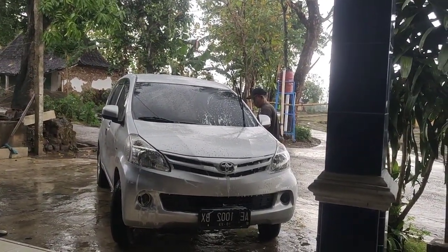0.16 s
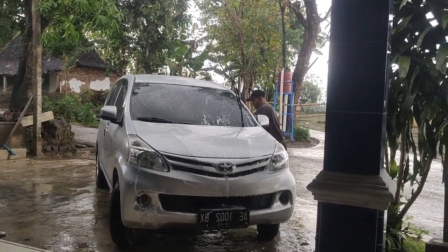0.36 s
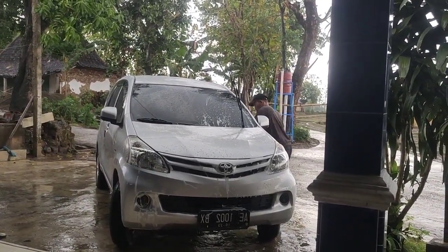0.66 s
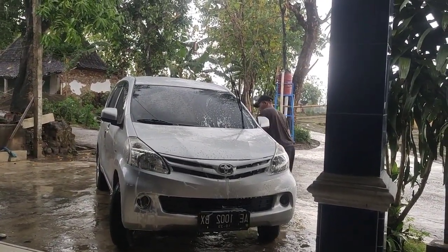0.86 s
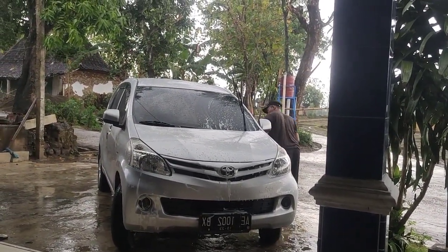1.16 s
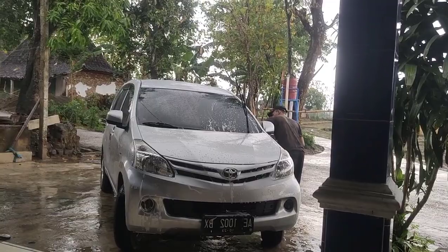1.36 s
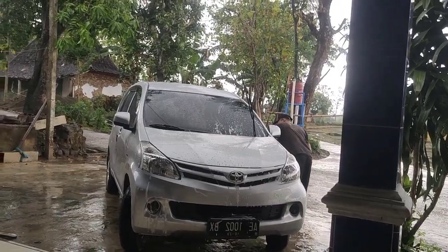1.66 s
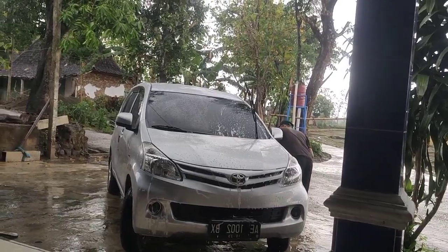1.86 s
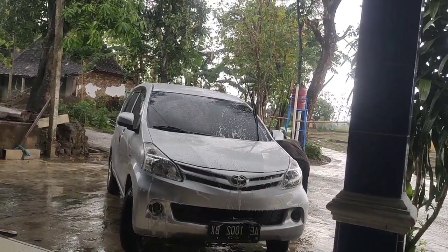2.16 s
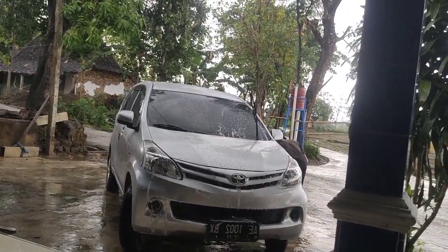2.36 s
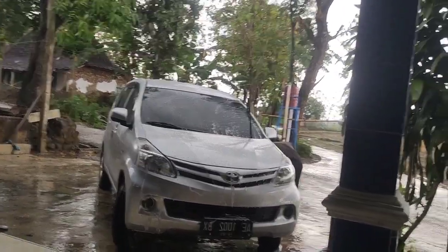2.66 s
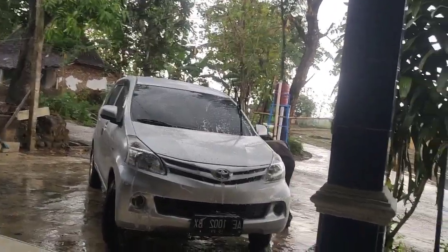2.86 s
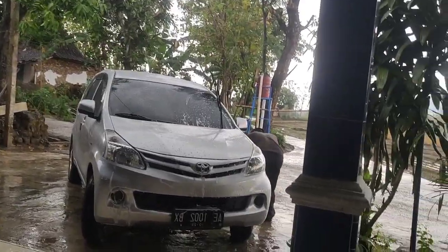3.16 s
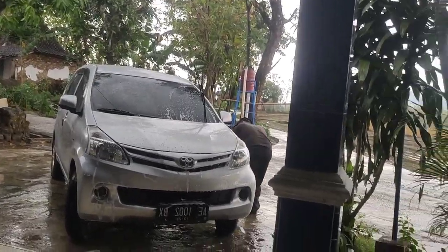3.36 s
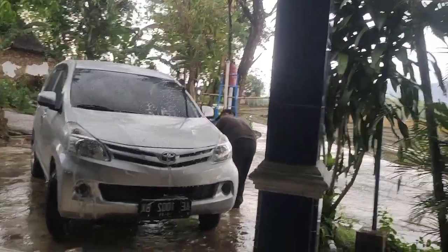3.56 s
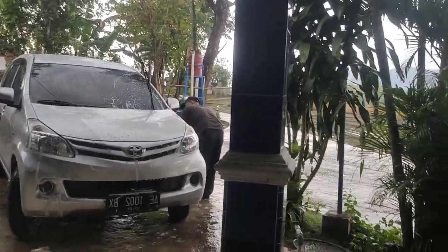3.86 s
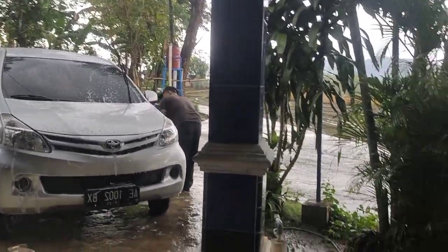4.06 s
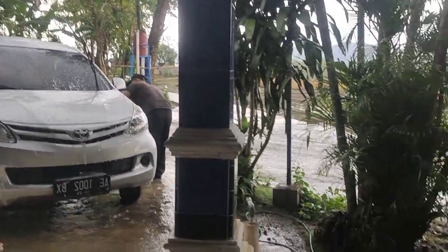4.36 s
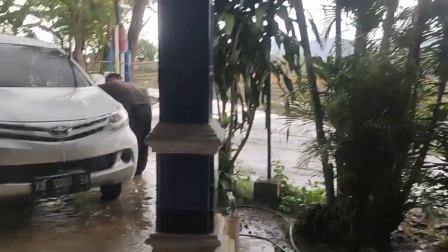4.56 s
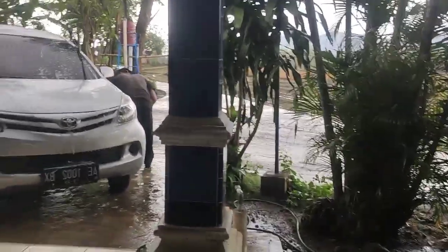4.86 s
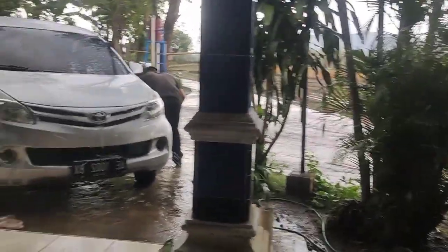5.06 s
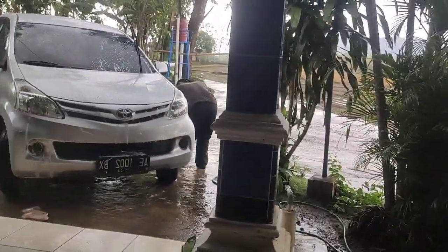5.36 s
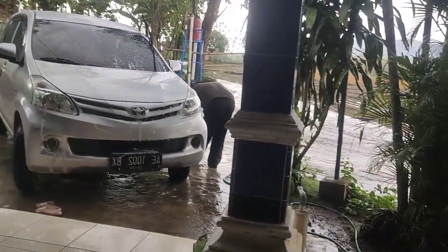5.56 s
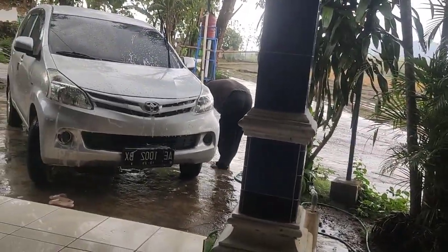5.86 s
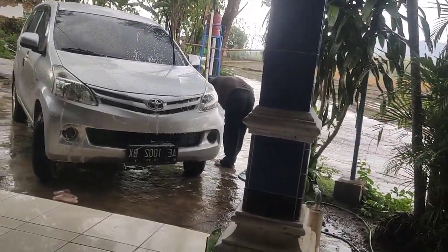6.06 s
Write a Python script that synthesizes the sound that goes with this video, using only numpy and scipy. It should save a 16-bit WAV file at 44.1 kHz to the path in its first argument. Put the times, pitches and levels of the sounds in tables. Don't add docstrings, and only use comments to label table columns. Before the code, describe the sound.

Outdoors in the rain, close drops tick first, then a rooster's rough, loud crow bursts out among overlapping hen cackles, slightly left. After its long fading note come a deep water plop and several raspy squawks. The rest is quieter: throaty clucks in loose succession and whistled chick peeps. Walls add a short tail; the wide stereo sound is dull at the very top.

```python
import sys
import numpy as np
from scipy import signal
from scipy.fft import rfft, irfft, next_fast_len
from scipy.io import wavfile
from scipy.ndimage import uniform_filter1d, minimum_filter1d

SR = 44100
rng = np.random.default_rng(int(sys.argv[2]) if len(sys.argv) > 2 else 0)


def pcm_store(signal):
    levels = np.round(np.clip(np.atleast_2d(signal), -1, 1) * 32767)
    wavfile.write(sys.argv[1], SR, levels.astype(np.int16).T)


def makeup_ratio(level_db):
    decades = np.asarray(level_db, float) / 20
    return 10 ** decades


N = 274302

# frequency in Hz, left-right likeness (-1 to 1).
SAME = [(60, -1.4), (170, 0.92), (480, 0.77), (1370, -0.08), (3870, 0.059), (11000, 0.084)]


def evened(x):
    return x / np.sqrt(np.mean(abs(x) ** 2) + 1e-20)


def read(points, hz):
    f, value = np.transpose(points)
    return np.interp(np.log(hz + 1), np.log(f + 1), value)


def add(mix, s, sound):
    part = mix[round(s * SR):][:len(sound)]
    part += sound[:len(part)]


def wander(length, hz):
    r = np.exp(-2 * np.pi * hz / SR)
    drift = signal.lfilter([1], [1, -2 * r, r * r], rng.standard_normal(length + 2000))
    return evened(drift[2000:])


def coloured(x, points):
    size = next_fast_len(len(x), True)
    gain = makeup_ratio(read(points, np.fft.rfftfreq(size, 1 / SR)))
    return irfft(rfft(x, size) * gain, size)[:len(x)]


def resonate(x, hz, width_hz):
    return signal.lfilter(*signal.iirpeak(hz, hz / width_hz, SR), x)


def unfold(rows):
    s, *columns = np.transpose(rows)
    t = np.arange(s[0], s[-1], 1 / SR)
    edge = signal.windows.tukey(len(t), min(1, .05 / (s[-1] - s[0])))
    return s[0], [np.interp(t, s, c) for c in columns], edge


def partials(hz, levels_db, jitter, flutter):
    turns = np.cumsum(hz * (1 + jitter * wander(len(hz), 59.3))) / SR
    swing = wander(len(hz) + 600 * len(levels_db), 62)
    out = np.zeros(len(hz))
    for k, db in enumerate(levels_db, start=1):
        level = makeup_ratio(db) * (1 + flutter * swing[600 * (k - 1):][:len(hz)])
        out += level * np.cos(2 * np.pi * (k * turns + rng.random()))
    return np.sqrt(2) * out, turns


def correlated(left, other):
    same = np.clip(read(SAME, np.linspace(0, SR / 2, left.shape[0])), -1, 1)[:, None]
    return np.array([left, same * left + np.sqrt(1 - same ** 2) * other])


def yard(x):
    # frequency in Hz, 60 dB decay time in seconds.
    decay = [(200, 0.32), (1000, 0.35), (4000, 0.39), (10000, 0.12)]
    taps = np.zeros((2, SR // 2))
    at = np.arange(300, SR // 2 - 20, 20) + rng.integers(0, 20, (2, (SR // 2 - 301) // 20))
    np.put_along_axis(taps, at, rng.choice([-1., 1.], at.shape), 1)
    hz, t, z = signal.stft(taps, SR, nperseg=256)
    z = correlated(z[0], z[1])
    tail = signal.istft(z * makeup_ratio(-60 * t / read(decay, hz)[:, None]), SR, nperseg=256)[1]
    return signal.oaconvolve(x[None], tail / np.linalg.norm(tail[0]), axes=1)[:, :N]


def placed(voice, rows, lag_s, pan_db, wet_db, trim_db):
    x = np.zeros(N)
    for row in rows:
        add(x, *voice(row))
    late = np.roll(x, round(lag_s * SR))
    direct = np.array([x * makeup_ratio(pan_db / 2), late * makeup_ratio(-pan_db / 2)])
    return makeup_ratio(trim_db) * (direct + makeup_ratio(wet_db) * yard(x))


def rain():
    # frequency in Hz, spectral density in dB per Hz.
    spectrum = [(24, -56), (40, -9), (253, 2), (344, 1), (608, 7), (1330, -7), (2960, -10), (4650, -24.5),
                (7640, -12.5), (8600, -16.5), (9680, -31.5), (11400, -27), (14800, -52), (22000, -120)]
    # time in seconds, level of the bright hiss in dB.
    bright_hiss = [(0, -42.5), (1.2, -44.5), (2.7, -43), (4.4, -44.5), (4.7, -49), (5.4, -47.5),
                   (6.22, -49)]
    rain_db, ticks_db = -48.5, -74
    frames, hz = N // 128 + 5, np.fft.rfftfreq(512, 1 / SR)
    a, b, c, d, patches = rng.standard_normal((frames, 257, 5)).T
    patches = evened(uniform_filter1d(uniform_filter1d(patches, size=8, axis=0), size=30, axis=1))
    flicker = evened(uniform_filter1d(rng.standard_normal(frames), size=5))
    s, hiss_db = np.transpose(bright_hiss)
    swell_db = np.interp(np.arange(frames) * 128 / SR, s, hiss_db + 59.5)
    share = np.clip(np.log(hz / 700 + 1e-9) / np.log(6), 0, 1)[:, None]

    z = correlated(a + 1j * b, c + 1j * d) * makeup_ratio(read(spectrum, hz)[:, None])
    steady = signal.istft(z, nperseg=512, noverlap=384)[1]
    scale = makeup_ratio(rain_db) / np.sqrt(np.mean(steady ** 2))
    z *= makeup_ratio(0.34 * patches + share * (swell_db + 1.7 * flicker))
    wash = scale * signal.istft(z, nperseg=512, noverlap=384)[1][:, :N]

    hits = rng.random((2, N)) < 400 / SR
    size = makeup_ratio(6.3 * np.minimum(rng.exponential(1, (2, N)), 5)) * hits
    t = np.arange(120) / SR
    click = np.exp(-t / 0.00019) * np.sin(2 * np.pi * 7000 * t)
    ticks = signal.oaconvolve(size, click[None], axes=1)[:, :N]
    swell = makeup_ratio(np.interp(np.arange(N) / 128, np.arange(frames), swell_db))
    return wash + makeup_ratio(ticks_db) * evened(ticks) * swell


def drip(s, db, hz):
    t = np.arange(3000) / SR
    tick = np.exp(-t / 0.0035) * np.sin(2 * np.pi * hz * t)
    splash = evened(resonate(rng.standard_normal(len(t)), hz, 0.21 * hz)) * np.exp(-t / 0.0042)
    return s, makeup_ratio(db) * (tick + 1.54 * splash)


def near_drips():
    # start in seconds, peak level in dB, ring frequency in Hz.
    drops = [
        (0.0473, -39.5, 8100),
        (0.0657, -37.5, 2790),
        (0.1376, -38, 3140),
        (0.1642, -43, 4220),
        (2.514, -27.5, 1400),
        (6.205, -36.5, 7000),
    ]
    return placed(lambda row: drip(*row), drops, .00002, .3, 0.93, 1.0)


def peep(s, db, stretch):
    # time in seconds, pitch in Hz, level in dB.
    glide = [
        (0, 4180, -18),
        (.03, 4400, -16),
        (.085, 4230, -18),
        (.11, 4020, -15),
        (.13, 3450, -12),
        (.165, 2800, -10),
    ]
    _, (hz, shape_db), edge = unfold([(at * stretch, pitch, level) for at, pitch, level in glide])
    return s, partials(hz, [db + shape_db], jitter=.006, flutter=.45)[0] * edge


def chick():
    # start in seconds, peak level in dB, time stretch as a ratio.
    peeps = [(0.16, -36, 0.94), (.545, -37, 1.22), (4.245, -36, 1.09), (4.843, -36, 1.01),
             (5.178, -34, .98), (5.766, -36, 0.94)]
    return placed(lambda row: peep(*row), peeps, .00005, 0.4, 0, 1.2)


def cackle(rows, above_db):
    # frequency in Hz, throat gain in dB.
    throat = [(260, -15), (520, -14), (1050, 2.5), (1600, -6), (1900, -2.5), (2200, 6), (2800, 3.5),
              (4000, -14.5), (5500, -17.5), (7600, -2.5), (9000, -25), (11500, -23.5)]
    strain_hz, bright_db_per_hz = 521, 0.1067
    s, (hz, effort_db, rough), edge = unfold(rows)
    push_db = 0.14 * (effort_db - effort_db.max())
    bright_db = above_db + effort_db + push_db + bright_db_per_hz * (hz - strain_hz)
    tiring = np.linspace(0, 1, len(hz)) ** 3
    rough, half_db = np.clip(rough, 0, 1), -24 + 26 * tiring
    levels = []
    for k in range(1, 19):
        source_db = bright_db if k > 7 else effort_db
        levels.append(read(throat, k * hz / 2) + source_db + half_db * (k % 2))
    tone, turns = partials(hz / 2, levels, jitter=.03 * rough, flutter=.15 + 1.1 * rough)

    gate = 0.59 + np.exp(-(2 * turns % 1) / 0.098)
    puffs = coloured(gate * rng.standard_normal(len(hz)), [(400, -36), *throat[1:]])
    low = signal.lfilter(*signal.butter(2, 1900, fs=SR), puffs)
    breath = (.6 + tiring) * makeup_ratio(effort_db) * low + 1.1 * makeup_ratio(bright_db) * (puffs - low)
    breath = breath / np.std(low)
    hiss = evened(coloured(puffs, [(3500, -18), (5000, -4.5)]))
    return s, edge * (np.sqrt(1 - rough ** 2) * tone + rough * breath + makeup_ratio(bright_db + 1.5) * hiss)


def syllable(s, length, db, hz, after_hz):
    rough_start, rough_break, rough_end = .46, .33, .55
    return [(s, hz, db + 33.5, rough_start),
            (s + 0.0067, hz, db, rough_start),
            (s + 0.38 * length, hz, db - 1.0, rough_start),
            (s + .5 * length, after_hz, db + 3, rough_break),
            (s + 0.72 * length, after_hz, db - 6.0, rough_break),
            (s + length, .98 * after_hz, db - 12.5, rough_end)]


def other_hen():
    # start in seconds, length in seconds, effort in dB, pitch in Hz, pitch after the break in Hz.
    calls = [
        (.465, 0.1, -25.5, 501.4, 497),
        (0.564, 0.14, -27.5, 549, 561),
        (0.774, 0.029, -23.5, 525, 528),
        (0.894, 0.353, -25, 528.7, 547),
        (1.505, 0.27, -28.5, 513.7, 518.3),
        (2.501, 0.1, -36, 530, 523.5),
    ]
    return placed(lambda rows: cackle(rows, above_db=-15), [syllable(*row) for row in calls],
                  0.00015, -0.45, -1.3, -7.5)


def crow(rows, hoarse):
    # frequency in Hz, throat gain in dB.
    throat = [(2200, -9.5), (3000, 3), (4000, -23), (5500, -2.5), (7500, 9), (9000, -24), (11500, -16.5)]
    # frequency in Hz, gain in dB.
    beak = [(1150, -9), (1400, -1.5), (1700, 3), (2050, -23.5), (2550, -28)]
    s, (hz, first_db, beak_db), edge = unfold(rows)
    second_db, third_db = (first_db + beak_db + read(beak, k * hz) for k in range(2, 4))
    upper_db = first_db + .5 * beak_db - 31
    upper = [upper_db + 3 + read(throat, k * hz) for k in range(4, 14)]
    levels = [first_db, second_db, third_db] + upper
    tone, turns = partials(hz, levels, jitter=.006 * hoarse, flutter=.25 * hoarse)

    puffs = (1.1 + np.exp(-(turns % 1) / 0.59)) * rng.standard_normal(len(hz))
    rasp = evened(coloured(puffs, [(350, -47), (650, -7.5), (1700, 15), (2050, 15.5), (2500, -14)]))
    breath = evened(coloured(puffs, [(1500, -10), *throat]))
    rasp_level = makeup_ratio(np.maximum(first_db, second_db) - 16) * hoarse
    return s, edge * (tone + rasp_level * rasp + makeup_ratio(upper_db + 7) * breath)


def note(s, length, db, hz, beak_db):
    rise_s, scoop, sag_hz_per_s = 0.024, 0.0299, 230
    hold = .78 * length
    return [(s, hz * (1 - scoop), db + 4, beak_db),
            (s + rise_s, hz, db, beak_db),
            (s + hold, hz - sag_hz_per_s * hold, db, beak_db),
            (s + length, hz - sag_hz_per_s * length, db - 10, beak_db)]


def rooster():
    # start in seconds, length in seconds, effort in dB, pitch in Hz, beak opening in dB.
    short_notes = [
        (0.48, .21, -28, 710, 5.5),
        (0.561, 0.1, -31.5, 590.3, 5.5),
        (0.767, 0.074, -26, 757, 2.5),
        (0.803, 0.1053, -17.5, 854.3, 0),
        (.975, 0.226, -34.5, 771, 11.5),
        (1.232, 0.208, -17.5, 855, 0.5),
        (1.972, 0.12, -31, 700, 7),
    ]
    # time in seconds, pitch in Hz, effort in dB, beak opening in dB.
    long_note = [
        (1.07, 608.6, -35, 2),
        (1.15, 687, -24, 6),
        (1.24, 699, -12, -18),
        (1.31, 711.6, -33, 3),
        (1.42, 687.5, -17.5, -5),
        (1.5, 712, -22.5, -3),
        (1.6, 678.5, -35, 14),
        (1.68, 653, -29, -11),
    ]
    # time in seconds, pitch in Hz, effort in dB, beak opening in dB.
    last_note = [
        (1.786, 550, -26.5, -2.5),
        (1.871, 580.3, -21, -6.5),
        (1.958, 592, -24.5, 1),
        (2.028, 585.7, -41, -7.5),
        (2.13, 597.5, -22, -1),
        (2.2, 576.5, -24.5, -5.5),
        (2.269, 535, -31, 1),
        (2.45, 501.5, -36.5, 1),
        (2.53, 477, -50, 15),
    ]
    hoarse_start, hoarse_last = 1.35, .8
    calls = [(note(*row), hoarse_start) for row in short_notes]
    calls += [(long_note, hoarse_start), (last_note, hoarse_last)]
    return placed(lambda call: crow(*call), calls, 0.00021, -2.6, -5.5, 0.62)


def hen():
    # start in seconds, length in seconds, effort in dB, pitch in Hz, pitch after the break in Hz.
    cackles = [(1.668, 0.15, -28, 591.2, 512.6), (1.876, .14, -27, 566, 489),
               (2.07, 0.16, -26.5, 548.5, 505), (2.33, 0.23, -27.5, 563.7, 479.8),
               (2.624, .25, -27.5, 557.3, 476), (3.384, 0.23, -27, 554.2, 478.6)]
    # time in seconds, pitch in Hz, effort in dB, roughness (0 to 1).
    squawks = [
        [(1.05, 458.6, -25, 0.5), (1.104, 473.8, -23.5, 0.54), (1.21, 510.8, -29.5, 0.4),
         (1.31, 549.2, -29, 0.5), (1.5, 582.5, -31, 0.5), (1.63, 583, -38.5, 0.64)],
        [(3.0, 503.4, -33, .3), (3.02, 508.7, -28.5, 0.42), (3.11, 538, -28.5, 0.36), (3.2, 513.5, -28, 0.47),
         (3.25, 498, -32.5, 0.65), (3.32, 493.6, -62, 0.6)],
        [(3.795, 466, -19, 0), (3.813, 471.7, -27.5, 0.25), (3.9, 486.4, -28.5, 0.31),
         (4.019, 549.5, -28.5, 0.32), (4.131, 505, -31.5, 0.53), (4.2, 474.8, -43.5, 0.65)],
    ]
    calls = [syllable(*row) for row in cackles] + list(squawks)
    return placed(lambda rows: cackle(rows, above_db=-9), calls, .00024, -2.9, -6, -1.73)


def cluck(s, db, hz, throat_hz, low_db):
    t = np.arange(round(.075 * SR)) / SR
    hz = throat_hz / np.round(throat_hz / hz)
    levels = [low_db + 12.0, -3, -3, -6, -12, -16]
    tone, _ = partials(hz * (1.02 - .5 * t), levels, jitter=0.051, flutter=0.59)
    drive = tone + 0.93 * rng.standard_normal(len(t))
    ring = evened(resonate(resonate(drive, throat_hz, 280), throat_hz, 280)) + .5 * tone
    return s - .01, makeup_ratio(db - 7.0) * ring * np.sin(np.pi * (t / t[-1]) ** 0.51) ** 1.84


def soft_clucks():
    # start in seconds, peak level in dB, pitch in Hz, throat resonance in Hz, lowest partial in dB.
    calls = [(3.697, -29, 296, 872, -20), (3.936, -35, 222, 777, -34), (4.05, -30.5, 276.4, 544, -28),
             (4.228, -35.5, 264, 547, -19), (4.328, -57, 304, 539, 4), (4.421, -32.5, 282.5, 718, -22),
             (4.561, -33.5, 261, 733, -20), (4.721, -40, 221.5, 657, -14), (4.914, -38.5, 207.8, 602, -26),
             (5.177, -40.5, 272, 445, -23), (5.239, -35.5, 264, 831, -13.5),
             (5.343, -42.5, 290.5, 568, -15), (5.447, -34.5, 238, 721, -14), (5.564, -36, 232, 762, -9.5),
             (5.699, -36.5, 263.6, 482, -20), (5.973, -43, 269, 451, -6), (6.029, -47.5, 266, 819, -2.5),
             (6.131, -44.5, 215, 672, -16)]
    return placed(lambda row: cluck(*row), calls, .00005, -0.54, -3.5, -0.092)


def scene():
    return rooster() + hen() + other_hen() + soft_clucks() + chick() + near_drips() + rain()


def gated(x):
    hz, _, z = signal.stft(x, SR, nperseg=1024)
    power = uniform_filter1d((abs(z) ** 2).sum(0), size=3, axis=0)
    band_db = 10 * np.log10(uniform_filter1d(power, size=3, axis=1) + 1e-16)
    luck = rng.standard_normal((len(hz) // 4 + 1, z.shape[2] // 2 + 1))
    luck_db = 2 * np.kron(luck, np.ones((4, 2)))[:len(hz), :z.shape[2]]
    near_db = -minimum_filter1d(-band_db, size=19, axis=0)
    moment_db = np.percentile(band_db[60:200], 80, axis=0)
    covered = (band_db < near_db - 20) & (hz[:, None] > 1700)
    covered |= (band_db < moment_db - 17 + luck_db) & (hz[:, None] > 8500)
    return signal.istft(z * np.where(covered, makeup_ratio(-50), 1), SR, nperseg=1024)[1][:, :N]


def top_cut(x):
    return signal.sosfilt(signal.butter(12, 11570, fs=SR, output="sos"), x)


def record(dry):
    # frequency in Hz, difference in dB.
    sides = [(50, 10.5), (130, 1.5), (1000, 1), (2400, -2.5), (3800, -6), (5000, -9.5), (6000, 1.5)]
    size = next_fast_len(N, True)
    tilt_db = np.multiply.outer([.5, -.5], read(sides, np.fft.rfftfreq(size, 1 / SR)))
    x = irfft(rfft(dry, size) * makeup_ratio(tilt_db), size)[:, :N]
    x = signal.sosfilt(signal.butter(4, 50, "high", fs=SR, output="sos"), x)
    ceiling = minimum_filter1d(np.minimum(1, .85 / (abs(x).max(0) + 1e-9)), size=800)
    x = gated(x * uniform_filter1d(ceiling, size=800))
    low_pass = signal.firwin(511, 11600, window=("kaiser", 9), fs=SR)
    limited = signal.oaconvolve(x, low_pass[None], "same")
    return top_cut(limited)


dry = scene()
out = record(dry)
pcm_store(out)
```